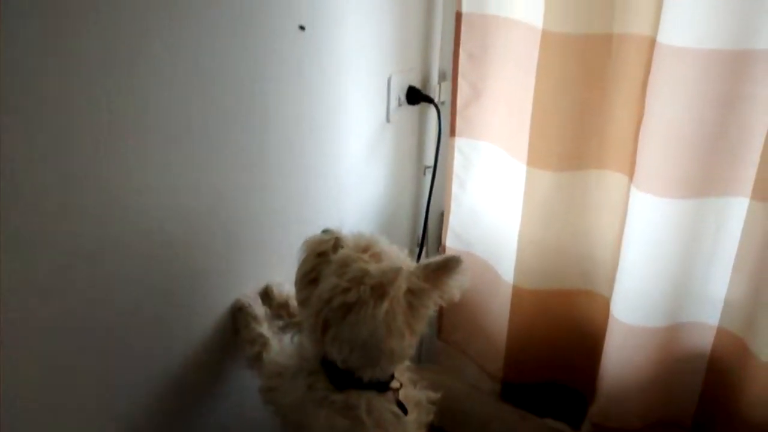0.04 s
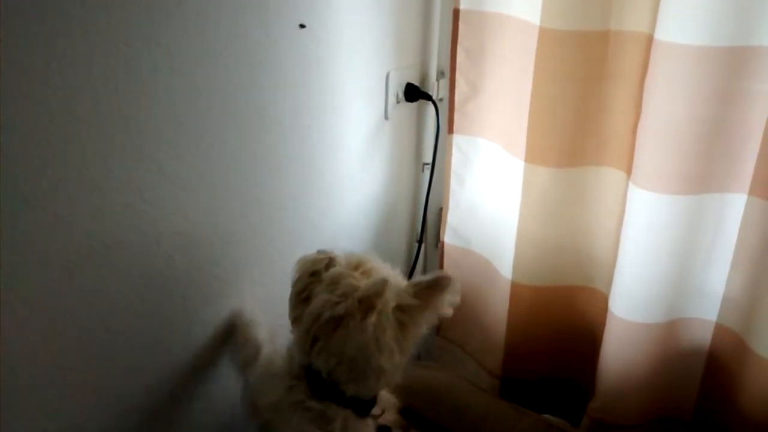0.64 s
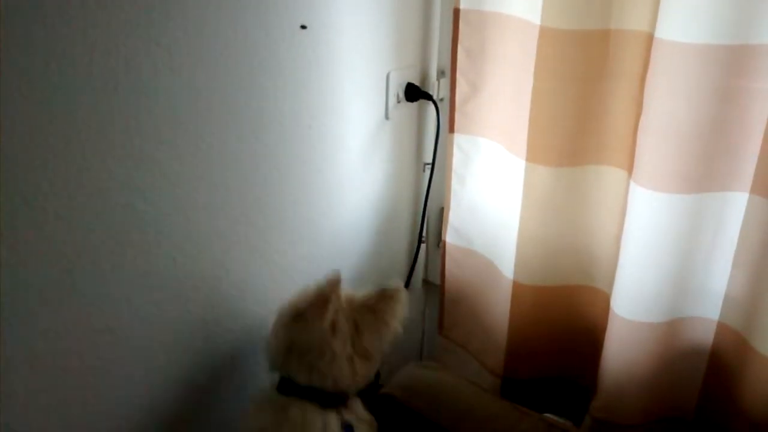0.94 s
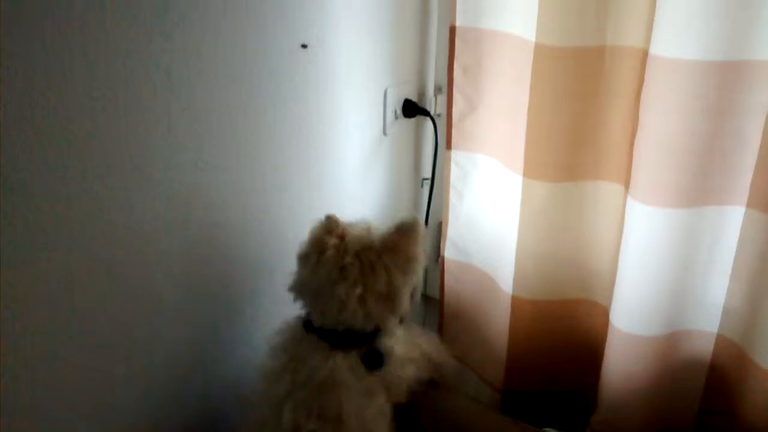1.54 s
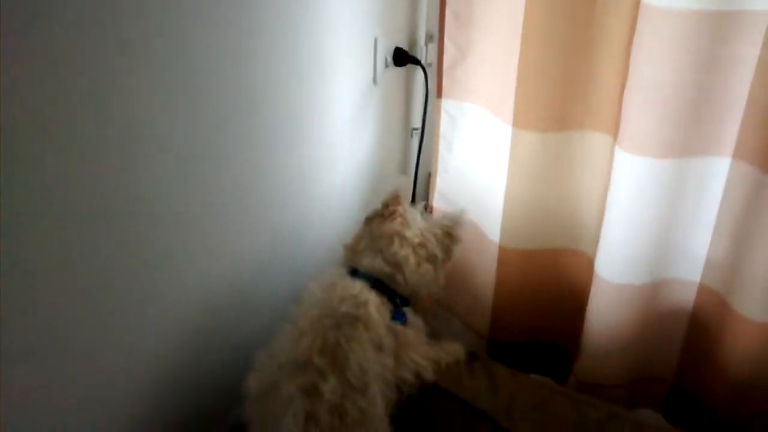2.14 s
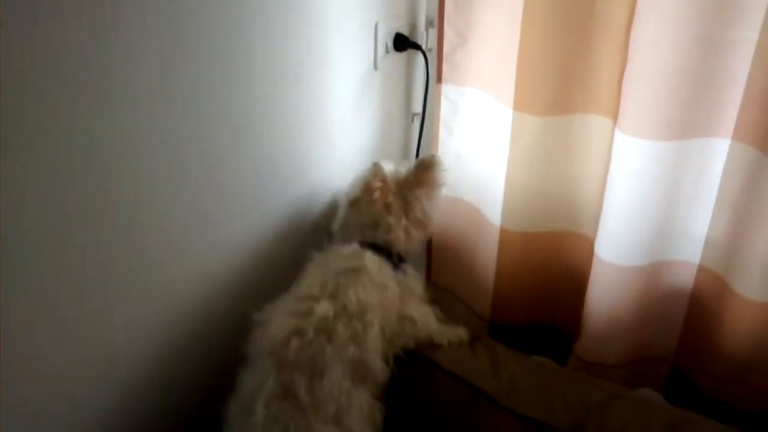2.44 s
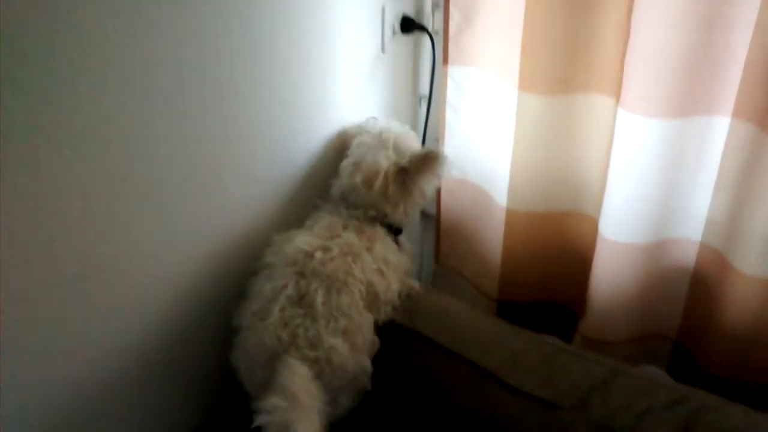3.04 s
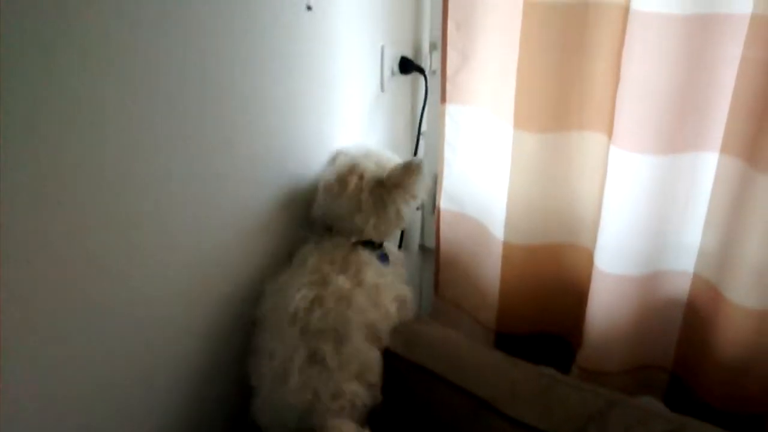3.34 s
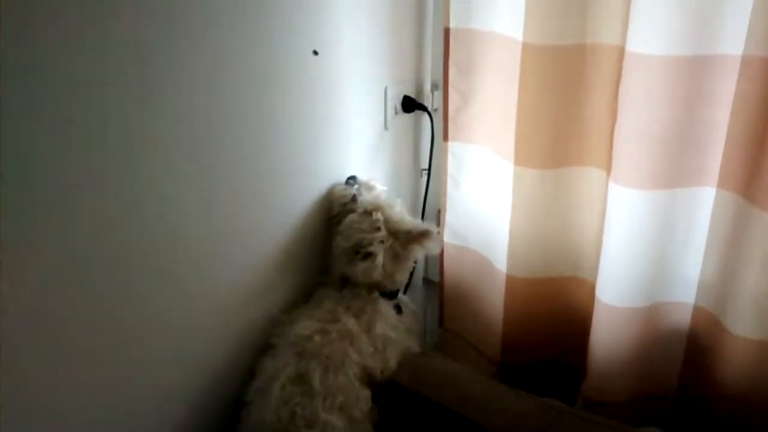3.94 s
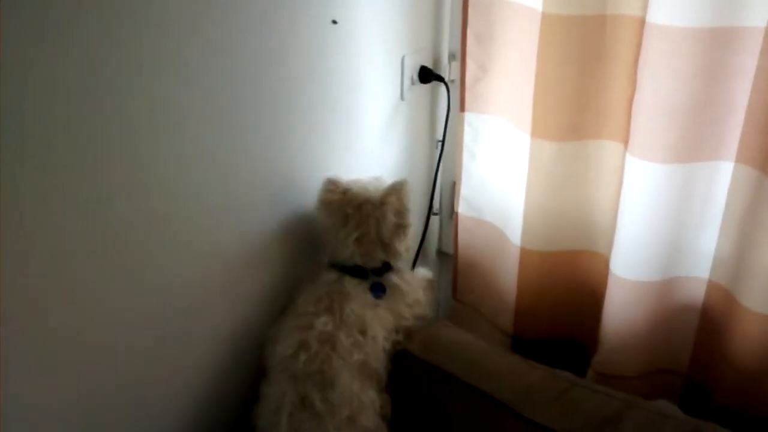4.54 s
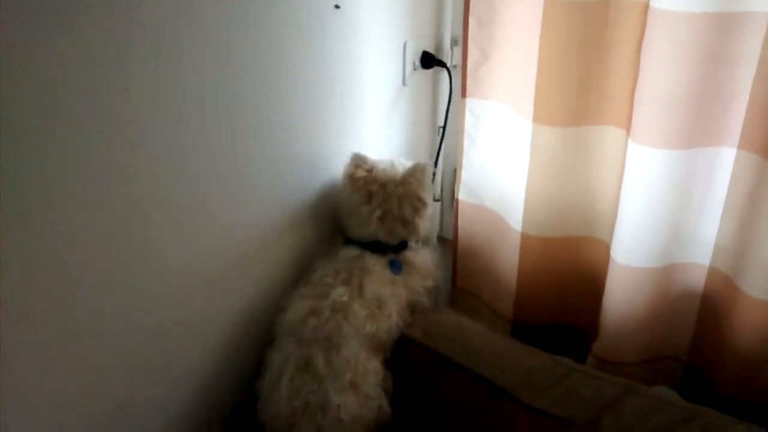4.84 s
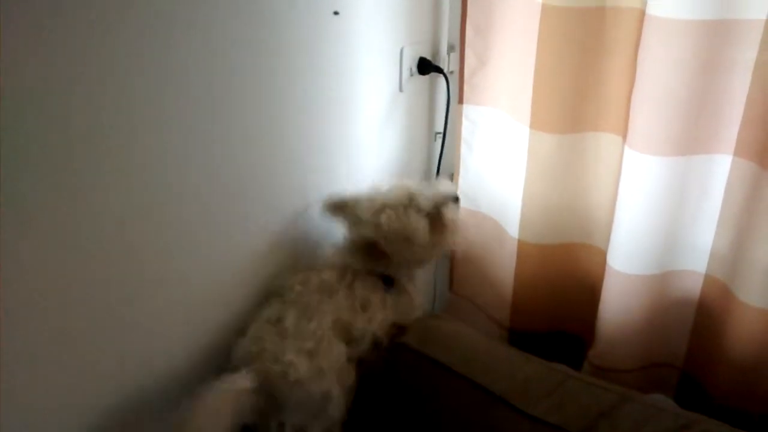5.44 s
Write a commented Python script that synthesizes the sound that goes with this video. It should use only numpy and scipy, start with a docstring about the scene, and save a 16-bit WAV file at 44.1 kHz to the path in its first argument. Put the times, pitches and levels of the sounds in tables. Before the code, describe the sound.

Close by in a quiet room, a small dog's claws knock and scratch on plaster in uneven bursts, with faint scuffling between them. The scrabbling builds to a quick rasp on fabric, a soft landing thump and a light metal tag clink. A paw judders briefly on the wall, and sparser taps follow. Soft hiss, low handling rumble and three sharp ticks come from the handheld microphone.

```python
"""Small dog pawing at a wall

In the corner of a furnished room, claws tap and scrape the plaster and ring the dull, boxy wall.
A pad judders, a claw zips over cloth, fur brushes past; the dog lands on a cushioned edge with soft
thuds and its metal collar tag clinks. A handheld camera close by adds hiss, rumble and three dry ticks."""
import sys
import numpy as np
from scipy import signal
from scipy.fft import rfft, irfft, next_fast_len
from scipy.io import wavfile
from scipy.ndimage import uniform_filter1d

SR = 44100
rng = np.random.default_rng(int(sys.argv[2]) if len(sys.argv) > 2 else 0)


def master(y):
    """Save y as 16-bit WAV."""
    cut = np.clip(np.atleast_2d(y).T, -1, 1)
    pcm = np.round(cut * 32767)  # scale
    wavfile.write(sys.argv[1], SR, pcm.astype(np.int16))


N = 246078
TIME = np.arange(N) / SR
SHORT = TIME[:SR // 2]  # time axis of one event

# the gritty edge of a scrape: freq_hz, level_db
GRIT = [(1200, -52), (2200, 2), (3500, -4.5), (4600, -15), (7000, -16.5), (14000, -41)]


def amp(db):
    """Decibels to gain."""
    return 10 ** (np.asarray(db) / 20)


def unit(x):
    """Scale to rms 1."""
    return x / np.sqrt(np.mean(x ** 2) + 1e-20)


def peaked(x):
    """Scale to peak 1."""
    return x / np.abs(x).max()


def along(points, hz):
    """Read a curve of (freq_hz, value) points on a log frequency axis."""
    freqs, values = np.transpose(points)
    return np.interp(np.log(hz + 1), np.log(freqs + 1), values)


def filtered(x, gain):
    """EQ x with a gain that depends on frequency."""
    n = x.shape[-1]
    padded = next_fast_len(n + SR // 8)
    return irfft(rfft(x, padded) * gain(np.fft.rfftfreq(padded, 1 / SR)), padded)[..., :n]


def coloured(x, spectrum):
    """EQ x with a (freq_hz, level_db) curve and scale to rms 1."""
    return unit(filtered(x, lambda hz: amp(along(spectrum, hz))))


def struck(force, gain):
    """Drive a body with this gain curve; minimum phase, so it rings only after the hit."""
    n = 2 * next_fast_len(len(force) // 2 + 1)
    cepstrum = irfft(np.log(np.maximum(gain(np.fft.rfftfreq(n, 1 / SR)), 1e-6)))
    cepstrum[1:n // 2] *= 2
    cepstrum[n // 2 + 1:] = 0
    return irfft(rfft(force, n) * np.exp(rfft(cepstrum)))[:len(force)]


def add(track, start_s, x):
    """Mix x into the track from start_s on."""
    part = track[..., max(round(start_s * SR), 0):][..., :x.shape[-1]]
    part += x[..., :part.shape[-1]]


def paired(two, correlation):
    """Turn two unrelated signals into a stereo pair whose width follows a correlation curve."""
    angle = lambda hz: np.arccos(np.clip(along(correlation, hz), -1, 1)) / 2
    mid, side = filtered(two, lambda hz: np.array([np.cos(angle(hz)), np.sin(angle(hz))]))
    return np.array([mid + side, mid - side])


def slips(n, rate_hz, spread_db):
    """Friction: tiny catches of uneven size at random times."""
    catches = (rng.random(n) < rate_hz / SR) * rng.choice([-1, 1], n)
    return catches * amp(spread_db * np.clip(rng.standard_normal(n), -2, 2))


def swell(t, rise_s, fall_s):
    """A rounded envelope that peaks at t = 0."""
    return np.exp(-np.abs(t / np.where(t < 0, rise_s, fall_s)) ** 2.9)


def ring(modes):
    """Damped sines from (pitch_hz, level_db, t60_s) rows."""
    return sum(amp(db - 60 * SHORT / t60) * np.sin(2 * np.pi * hz * SHORT) for hz, db, t60 in modes)


def wall(hz, tilt):
    """The dull, boxy tone of the corner; sharper contacts tilt it upward (dB per octave)."""
    # broad tone of the wall: freq_hz, level_db
    body = [(60, -6), (130, -5.5), (230, 2.5), (400, 2.5), (560, -2), (850, -3), (1200, -5.5), (1550, -10),
            (1850, -8), (2400, -19.5), (3500, -50), (6000, -34), (15000, -74)]
    # its resonances: centre_hz, width_hz, lift_db
    modes = [(440, 10, 2.5), (488, 7.4, 1.5), (658, 64, 2.5), (739, 60, 4), (923, 57, 5), (1240, 80, 0.5),
             (1506, 61, 7.5)]
    peaks_db = sum(lift_db / (1 + (2 * (hz - centre) / width) ** 2) for centre, width, lift_db in modes)
    return amp(along(body, hz) + peaks_db + tilt * np.log2(np.clip(hz, 100, 1200) / 700))


def spot(hz, tilt, ring_hz, ring_db, soft_hz, ring_q=2.9):
    """Each spot of the wall adds its own short ring; the pad dulls the contact above soft_hz."""
    lift = amp(ring_db / (1 + (2 * ring_q * (hz / ring_hz - 1)) ** 2))
    return wall(hz, tilt) * lift / np.hypot(1, (hz / soft_hz) ** 4)


def in_room(x, wet_db, early_db, early_s=0.021):
    """Place x in the room: reflections off the near walls and a short tail, new for each contact."""
    # decay of the furnished room: freq_hz, t60_s
    decay = [(100, 0.34), (270, 0.32), (450, 0.39), (800, 0.15), (1600, 0.23), (3600, 0.36), (12000, 0.13)]
    # stereo image of the reflections: freq_hz, correlation
    image = [(100, 0.76), (450, 0.39), (900, 0.9), (1500, 0.96), (2600, 0.0088), (3600, 0.77),
             (6000, 0.034)]
    hz, t, bands = signal.stft(rng.standard_normal((2, len(SHORT))), SR, nperseg=256)
    bands = bands * amp(-60 * t / along(decay, hz)[:, None])
    tail = signal.istft(bands, SR, nperseg=256)[1][:, :len(SHORT)]
    tail *= 1 - np.exp(-SHORT / 0.011)
    early = rng.standard_normal(tail.shape) * (SHORT > .002) * np.exp(-2 * SHORT / early_s)
    tail = amp(wet_db) * tail / np.linalg.norm(tail[0])
    early = amp(early_db) * early / np.linalg.norm(early[0])
    response = paired(tail + early, image)
    response[:, 0] += 1  # direct sound
    return signal.fftconvolve(x[None], response, axes=1)


def background(hiss_db=-55.5, rumble_trim_db=4):
    """The bed: steady room and microphone hiss, and the shifting rumble of the handheld camera."""
    # colour of the hiss: freq_hz, level_db
    hiss_tone = [(60, -2), (110, 5.5), (250, -1), (380, -0.5), (520, -2.5), (720, -7.5), (1100, -10),
                 (2400, -15), (3500, -16), (4700, -17.5), (6400, -16), (7700, -19.5), (8900, -18.5),
                 (15500, -21.5)]
    # its stereo image: freq_hz, correlation
    hiss_image = [(100, -1.04), (300, -0.9), (550, -0.18), (1000, 0.97), (1500, 0.87), (2100, 0.19),
                  (2600, 1), (3600, 1), (4800, -0.31), (15000, 0.13)]
    # colour of the rumble: freq_hz, level_db
    rumble_tone = [(12, -8), (25, -7), (36, -16.5), (48, 1), (62, -19), (100, -21.5), (250, -55)]
    # its level as the camera is handled: time_s, level_db
    handling = [(0.0, -60), (1.04, -59), (1.86, -50), (2.1, -57.5), (2.36, -56.5), (2.59, -53), (3.31, -54),
                (4.13, -63), (5.58, -58)]
    hiss = coloured(paired(rng.standard_normal((2, N)), hiss_image), hiss_tone)
    rumble = coloured(paired(rng.standard_normal((2, N)), [(40, 0.043)]), rumble_tone)
    hiss *= amp([[.3], [-.3]])  # left, right
    rumble *= amp([[3], [-5.5]])
    return amp(hiss_db) * hiss + amp(np.interp(TIME, *np.transpose(handling)) + rumble_trim_db) * rumble


def camera_ticks(right_delay_s=0.00036, right_db=-5.0):
    """Tiny dry ticks inside the camera jolt its two microphone ports in opposite directions."""
    # ticks: start_s, level_db
    ticks = [(0.1078, -15), (2.139, -15.5), (4.2250, -18.5)]
    # tone of a tick at the left port: freq_hz, level_db
    left_tone = [(80, -18), (350, 4), (1200, -3.5), (2400, -2.5), (3200, -5), (4500, 2), (5500, -1.5),
                 (7200, -7), (9000, -6), (15000, -26)]
    # and at the right port: freq_hz, level_db
    right_tone = [(80, -21), (350, -2), (1500, -8.5), (2400, -9.5), (3300, -6), (4100, 0), (5200, -8),
                  (6500, -21), (15000, -51)]
    out, jolt = np.zeros((2, N)), signal.unit_impulse(SR // 16)
    left = peaked(struck(jolt, lambda hz: amp(along(left_tone, hz))))
    right = peaked(struck(jolt, lambda hz: amp(along(right_tone, hz))))
    for start_s, level_db in ticks:
        add(out[0], start_s, -amp(level_db) * left)
        add(out[1], start_s + right_delay_s, amp(level_db + right_db) * right)
    return out


def shuffling(trim_db=-0.5):
    """The paws keep shifting with faint, irregular scuffs."""
    # how busily the dog moves: time_s, level_db
    effort = [(0.0, -72.5), (0.4, -68), (1.66, -60.5), (1.8, -56), (1.97, -59.5), (2.33, -63.5),
              (2.72, -60), (3.75, -63), (3.9, -66), (4.4, -62.5), (4.96, -72.5), (5.22, -69), (5.58, -61)]
    force = slips(N, rate_hz=260, spread_db=8.5)
    scuff = unit(filtered(force, lambda hz: wall(hz, tilt=-2.35))) + amp(-13.0) * coloured(force, GRIT)
    envelope = amp(np.interp(TIME, *np.transpose(effort)) + trim_db)
    return in_room(envelope * scuff, wet_db=-2.0, early_db=3.0)[:, :N]


def coat():
    """Wiry fur sweeps along the wall in soft, hissy strokes."""
    # brushes against the plaster: peak_s, level_db, rise_s, fall_s
    brushes = [(.375, -69, 0.023, 0.008), (0.596, -64, 0.012, 0.0059), (0.719, -61, 0.025, 0.024),
               (0.771, -62, 0.019, 0.011), (1.216, -69, 0.047, 0.0093)]
    # colour of the fur: freq_hz, level_db
    fur_tone = [(1500, -1.5), (2900, 4), (3450, 6), (4600, 0), (6500, 2.5), (10000, -8), (15000, -16)]
    envelope = sum(amp(db) * swell(TIME - peak_s, rise, fall) for peak_s, db, rise, fall in brushes)
    fur = coloured(slips(N, rate_hz=2000, spread_db=14), fur_tone)
    return in_room(envelope * fur, wet_db=-5.5, early_db=6.0)[:, :N]


def collar_tag(click_gain=1.4, click_t60_s=0.021, chatter=.65):
    """The metal tag hits its ring and chatters; where it is struck decides which modes sing."""
    # clinks: start_s, level_db, place (0 face to 1 rim)
    clinks = [(1.206, -42, 0.15), (1.214, -45, 0.099), (1.978, -42, 1), (1.99, -51, 1), (2.019, -53, 1)]
    # the tag's modes, struck on the face or the rim: pitch_hz, face_db, rim_db, t60_s
    modes = [(4270, -28, -3, .06), (4480, -28, -2, .05), (6850, -20, -9, .05), (8290, -35, -9, .12),
             (8580, -13, -28, .08), (8650, -11, -26, .24), (14530, 0, -18, .13), (14720, -4, -22, .06)]
    # click of metal on metal: freq_hz, level_db
    click_tone = [(1500, 3), (3500, 4), (6500, -2), (12000, -6), (15000, -10)]
    out = np.zeros((2, N))
    for start_s, level_db, place in clinks:
        tone = ring([(hz + rng.normal(0, 14), face_db + place * (rim_db - face_db), t60)
                     for hz, face_db, rim_db, t60 in modes])
        tone *= 1 + chatter * unit(uniform_filter1d(rng.standard_normal(len(SHORT)), size=120))
        click = coloured(rng.standard_normal(len(SHORT)), click_tone) * amp(-60 * SHORT / click_t60_s)
        clink = peaked(tone) + click_gain * peaked(click)
        add(out, start_s, in_room(amp(level_db) * clink, wet_db=-14, early_db=-31))
    return out


def thuds(scuff_db=-22, scuff_at_s=0.0041, scuff_s=0.0051):
    """Soft landings: paws scuff the cover, the cushioned edge gives and the floor booms under it."""
    # the dog's weight lands: start_s, level_db, pitch_hz, boom_db
    landings = [(0.912, -44.5, 140, -2), (1.313, -39, 187, 5), (1.4, -50, 160, 7), (1.696, -31, 292, -1.5),
                (1.943, -16.5, 228, -13), (1.971, -31, 204, -10), (1.992, -37, 230, -27),
                (3.772, -43, 163, -1.5)]
    # modes of the cushioned edge: pitch_ratio, level_db, t60_s
    cushion = [(1, 0, .026), (1.7, -16, .035)]
    # modes of the floor: pitch_hz, level_db, t60_s
    boards = [(44, -16, 0.28), (93.2, 3.5, 0.1), (196.4, -4, 0.19)]
    out = np.zeros((2, N))
    soft_attack = 1 - np.exp(-(SHORT / .007) ** 2)
    for start_s, level_db, pitch_hz, boom_db in landings:
        bump = peaked(ring([(ratio * pitch_hz, db, t60) for ratio, db, t60 in cushion]) * soft_attack)
        boom = peaked(ring(boards) * soft_attack)
        cover = struck(rng.standard_normal(len(SHORT)),
                       lambda hz: wall(hz, tilt=1.0) * np.hypot(1, hz / 900))
        scuff = peaked(cover * swell(SHORT - scuff_at_s, scuff_s, scuff_s))
        thud = bump + amp(boom_db) * boom + amp(scuff_db) * scuff
        add(out, start_s, in_room(amp(level_db) * thud, wet_db=-13.0, early_db=-11.5))
    return out


def cloth_zip(roughness=0.073):
    """A claw speeds up over the weave, so its catches sweep upward in pitch."""
    # the claw's whip across the cloth: time_s, pitch_hz, level_db
    sweep = [(1.676, 880, -52), (1.686, 1150, -39), (1.6885, 1720, -30.5), (1.692, 1870, -30),
             (1.6945, 3000, -35), (1.698, 3700, -39), (1.705, 3500, -53), (1.72, 3400, -66)]
    time_s, pitch_hz, level_db = np.transpose(sweep)
    t = time_s[0] + SHORT
    jitter = unit(uniform_filter1d(rng.standard_normal(len(t)), size=14))
    catch_hz = np.interp(t, time_s, pitch_hz) * (1 + roughness * jitter)
    phase = 2 * np.pi * np.cumsum(catch_hz) / SR
    rasp = np.sin(phase) + 0.069 * np.sin(2 * phase) + 0.17 * coloured(rng.standard_normal(len(t)), GRIT)
    envelope = amp(np.interp(t, time_s, level_db, right=-120))
    out = np.zeros((2, N))
    add(out, time_s[0], in_room(unit(rasp) * envelope, wet_db=-14.5, early_db=-5))
    return out


def pad_judder(start_s=3.3062, rate_hz=186, level_db=-23.5, count=6, jitter=0.067):
    """A pad grips and lets go at a nearly even rate, each slip knocking the wall, until it dies away."""
    force, out = np.zeros(SR // 8), np.zeros((2, N))
    for k, late in enumerate(rng.standard_normal(count)):
        add(force, (k + jitter * late) / rate_hz, np.array([1 - (k / count) ** 4]))
    knocks = struck(force, lambda hz: spot(hz, tilt=3.0, ring_hz=1400, ring_db=4, soft_hz=1450))
    add(out, start_s, in_room(amp(level_db) * peaked(knocks), wet_db=-11, early_db=-0.5, early_s=0.0086))
    return out


def scrape(force, grit_db, tilt, ring_hz, ring_db, soft_hz):
    """The catches of a claw ring one spot of the wall and shed grit."""
    body = unit(struck(force, lambda hz: spot(hz, tilt, ring_hz, ring_db, soft_hz)))
    return body + amp(grit_db) * coloured(force, GRIT)


def claw_strokes(trim_db=-1, drag_db=-16, drag_in_s=0.056, drag_out_s=0.1):
    """Claws stick and slip down the plaster: a short press inside a lighter drag."""
    # strokes: peak_s, level_db, press_s, tilt_db_per_octave, grit_db, ring_hz, ring_db, soft_hz
    strokes = [(1.33, -43.5, 0.027, -3, -11, 257, -5, 1720),
               (1.661, -38.5, 0.022, 2.5, -17, 795, 3.5, 1230), (1.69, -32, 0.015, 0, -12, 880, 6, 1880),
               (1.732, -43.5, 0.024, 0, -12, 420, 3, 1510), (2.566, -45, 0.0087, -6, -13.5, 267, -5, 1500),
               (2.827, -42, 0.034, 0, -18.5, 255, 10.5, 1530),
               (2.949, -43, .011, -3.5, -21, 256, 10.5, 1390), (3.165, -47.5, 0.014, 1, -25, 900, -3, 1600),
               (3.278, -46.5, 0.017, -4.5, -11.5, 200, 1, 1200),
               (3.315, -35, 0.019, 3, -17.5, 1300, -2, 1300),
               (3.372, -45.5, 0.031, -1.5, -33, 477, 11, 1500),
               (3.783, -46.5, 0.016, -5.5, -21, 201, 1, 1210), (4.093, -51, .026, -3.5, -28, 249, 6, 1500),
               (4.357, -55.5, 0.028, -6, -10, 377, 8, 1500),
               (5.41, -51.5, 0.077, -1.5, -30, 312, 11.5, 1300)]
    out, t = np.zeros((2, N)), SHORT - SHORT.mean()
    for peak_s, level_db, press_s, tilt, grit_db, ring_hz, ring_db, soft_hz in strokes:
        force = slips(len(t), rate_hz=1800, spread_db=1.5)
        press = swell(t, press_s, press_s)
        drag = amp(drag_db) * swell(t, drag_in_s, drag_out_s) * (1 - press)
        stroke = press * scrape(force, grit_db, tilt, ring_hz, ring_db, soft_hz)
        stroke += drag * scrape(force, grit_db=-23, tilt=-2.0, ring_hz=400, ring_db=4, soft_hz=1500)
        stroke *= amp(level_db + trim_db)
        add(out, peak_s + t[0], in_room(stroke, wet_db=-10.0, early_db=-4.5, early_s=0.016))
    return out


def paw_taps(follow_gain=0.44):
    """One claw hits the wall first; the other claws and the pad follow within milliseconds."""
    # firm taps: start_s, level_db, tilt_db_per_octave, ring_hz, ring_db, spread_s, room_db
    taps = [(0.904, -33.5, 1.5, 900, 2, 0.0061, 3), (1.168, -38, -1, 895, 4, 0.0055, 7.5),
            (1.233, -37, -4, 900, 11, .005, -6), (1.291, -37, 6, 860, 9, 0.0041, -5),
            (1.3117, -31, 1.5, 620, 8, 0.004, 2.5), (1.341, -29, -4, 800, -4, 0.0036, 6),
            (1.399, -29.5, -1.5, 866, 8.5, 0.00473, 5), (1.403, -30, 1.5, 900, 0, 0.003, 6),
            (1.489, -36.5, -0.5, 860, 7.5, .0087, 1), (1.623, -34, -3.5, 750, 11, 0.013, 8.5),
            (1.6966, -19.5, -7.5, 710, 14, 0.0024, -2), (1.8465, -27, -3, 724, 14.5, .011, 5),
            (2.415, -34.5, -1.5, 745, 1, .009, 4), (2.463, -39, -0.5, 740, 10, 0.0055, -4),
            (2.556, -31, -0.5, 700, 4, 0.0084, 4), (2.748, -33.5, 0, 760, 3, 0.0044, -6),
            (2.934, -33, 0, 885, 11.5, .0031, 2), (3.029, -39.5, -1.5, 700, -3, 0.014, -2),
            (3.1261, -29, 0, 784, 13, 0.00474, -2), (3.157, -34, 2, 760, -11, .008, 1),
            (3.562, -35, -3.5, 650, 1, 0.0074, 2.5), (4.555, -39.5, -1.5, 740, 7.5, 0.0035, -4),
            (5.099, -40, -1.5, 890, 6, 0.011, 7.5), (5.3322, -30.5, -3.5, 710, 7, .005, 1.5),
            (5.3727, -23, -1.5, 960, 15.5, .002, -7), (5.3759, -33.5, 4, 1410, 9.5, .002, -4),
            (5.5598, -30, -.5, 830, 9, .004, -1)]
    out = np.zeros((2, N))
    for start_s, level_db, tilt, ring_hz, ring_db, spread_s, room_db in taps:
        force = signal.unit_impulse(SR // 8)
        for late, size in rng.random(size=(3, 2)):
            add(force, spread_s * (0.5 + late), np.array([follow_gain * np.cos(np.pi * size)]))
        knock = struck(force, lambda hz: spot(hz, tilt, ring_hz, ring_db, soft_hz=1550))
        knock = amp(level_db) * peaked(knock)
        add(out, start_s, in_room(knock, wet_db=room_db - 9.5, early_db=room_db - 7, early_s=0.0085))
    return out


def through_ports(air, cavity_hz=2550, width_hz=800):
    """A cavity behind the right microphone port flips its phase in the upper mids."""
    pole = lambda hz: cavity_hz ** 2 - hz ** 2 + 1j * hz * width_hz
    return np.array([air[0], filtered(air[1], lambda hz: np.conj(pole(hz)) / pole(hz))])


def scene():
    """The mix: the dog in its corner, leaning left in the bass and the top, over the bed and ticks."""
    # the floor's reflection cancels a band of the bass: freq_hz, gain_db
    floor_notch = [(92, 3), (130, -6), (180, 0.5)]
    # the dog's stereo balance: freq_hz, left_minus_right_db
    balance = [(80, 9), (200, 2), (350, 3), (800, 1.5), (1600, -2.5), (2500, -2), (4500, -7), (8000, 6.5),
               (14000, 14)]
    bed, ticks = background(), camera_ticks()
    dog = paw_taps() + claw_strokes() + pad_judder() + cloth_zip()
    dog += thuds() + collar_tag() + coat() + shuffling()
    dog = filtered(dog, lambda hz: amp(along(floor_notch, hz) + np.outer([.5, -.5], along(balance, hz))))
    return through_ports(dog + bed) + ticks


def record(dry):
    """The microphone has a narrow dip in the upper mids and a steep high cut."""
    # microphone response: freq_hz, gain_db
    mic_dip = [(1900, -1.5), (2300, -5.5), (2600, -4), (2900, -2), (3300, 1)]
    high_cut_hz = 15650
    return filtered(dry, lambda hz: amp(along(mic_dip, hz)) * (hz < high_cut_hz))


dry = scene()
out = record(dry)
master(out)
```